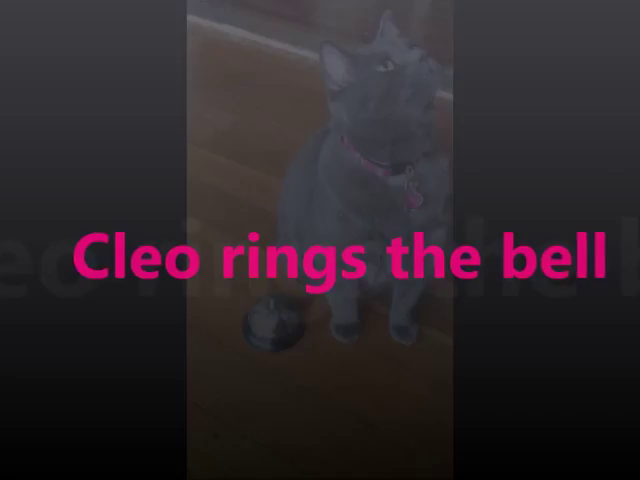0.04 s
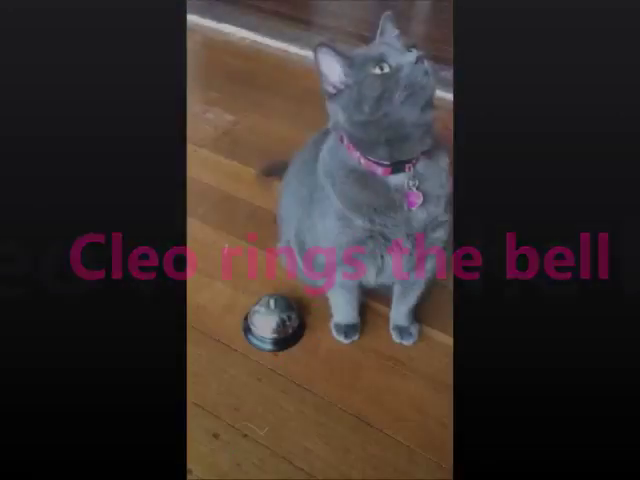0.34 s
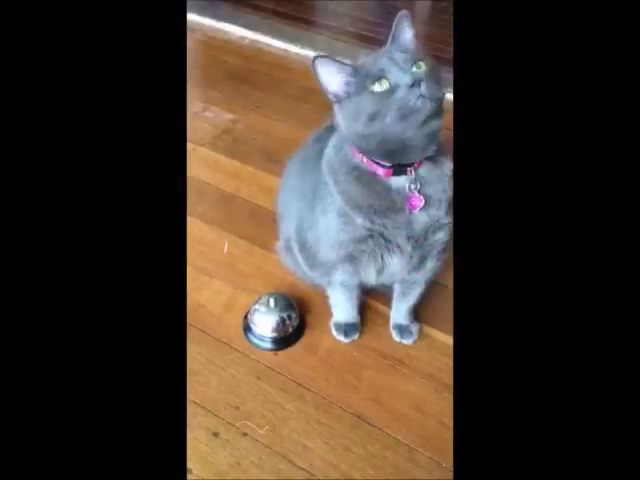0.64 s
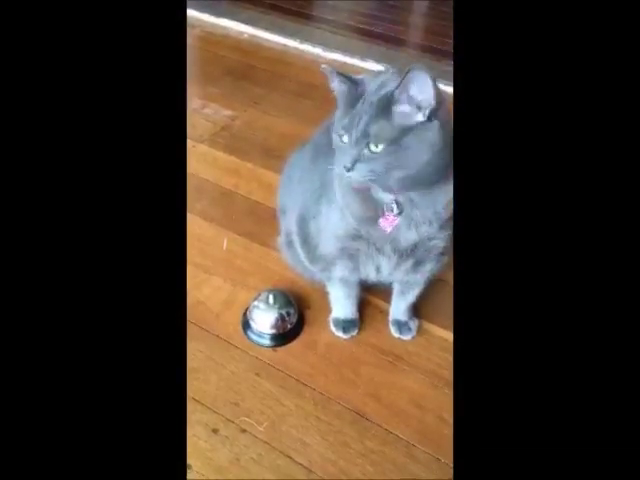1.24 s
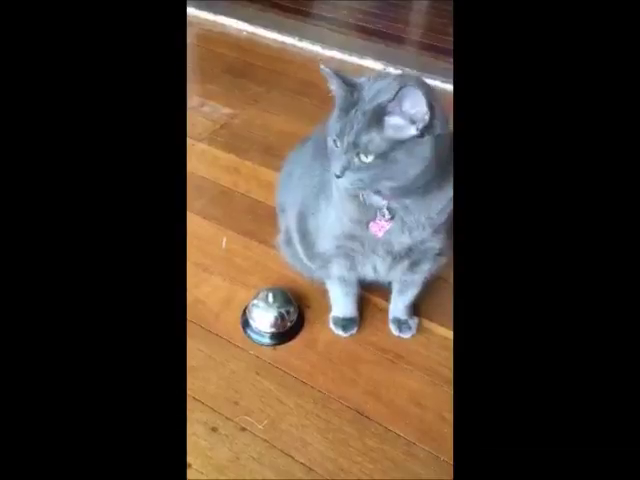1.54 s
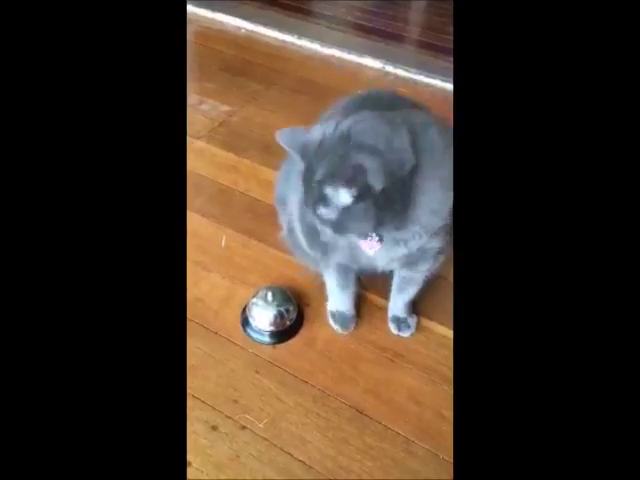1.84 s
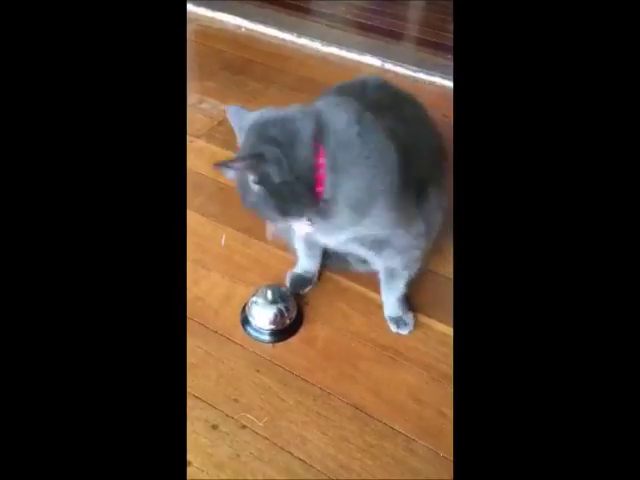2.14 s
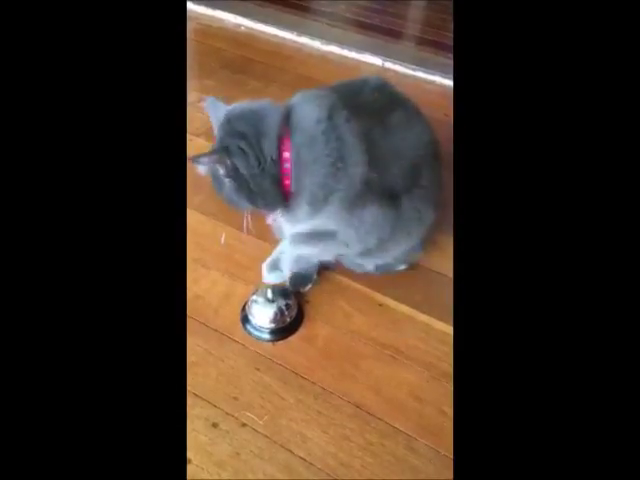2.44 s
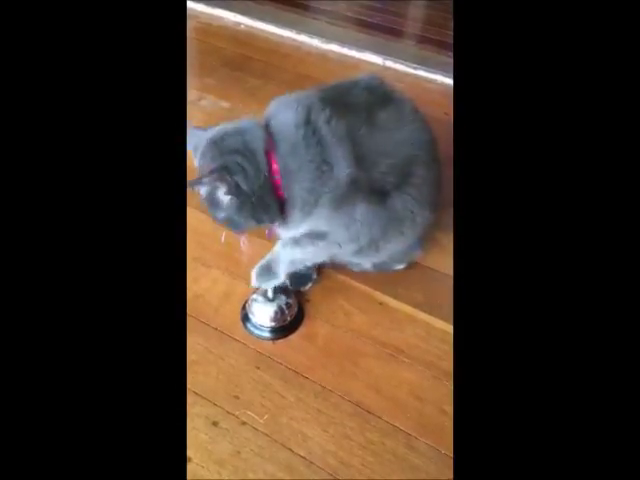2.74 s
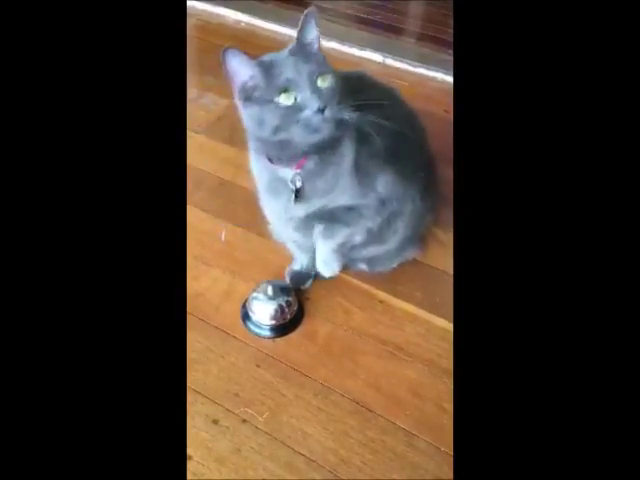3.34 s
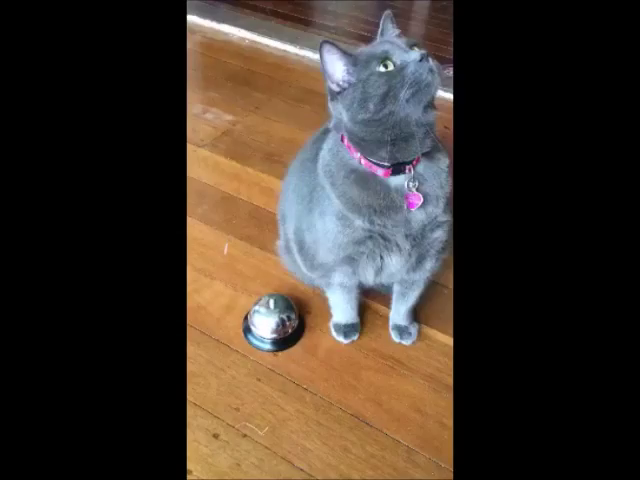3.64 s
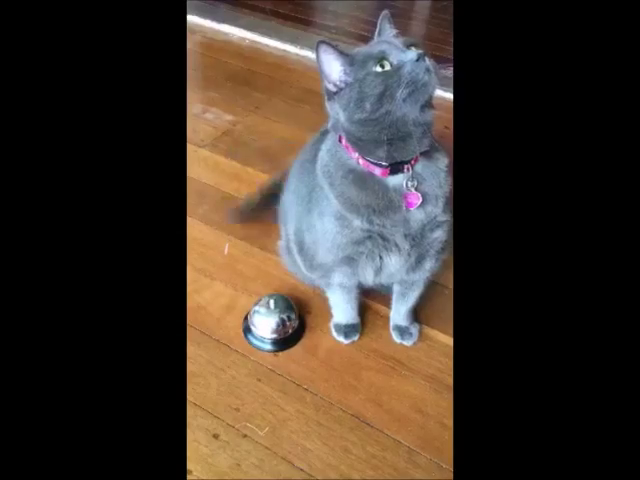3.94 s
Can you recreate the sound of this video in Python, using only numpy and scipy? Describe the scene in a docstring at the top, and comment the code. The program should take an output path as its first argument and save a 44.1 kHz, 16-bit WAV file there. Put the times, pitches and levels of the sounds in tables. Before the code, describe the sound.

A metal counter bell rings once, late, in a quiet room. Until then there is only low rumble and hum, faint distant birds and a cat's soft paw bumps and scuffs, around 0.4 and 2.6 seconds. At 2.9 seconds the plunger rattles and the bell gives a bright, wavering ding with a few small clicks. It cuts off mid-ring at 3.6 seconds; a faint dull rumble follows a brief silence.

```python
"""A quiet room with a wooden floor, where a cat paws a counter bell.
The plunger rattles down, the clapper strikes, and the dome rings in four beating pairs of modes.
Paws bump and scuff; behind them are faint far birds, an appliance hum, a low drone and room rumble.
The sound cuts off mid-ring, and after a short silence a duller rumble follows."""
import sys
import numpy as np
from scipy import signal
from scipy.fft import rfft, irfft
from scipy.io import wavfile

SR = 44100
rng = np.random.default_rng(int(sys.argv[2]) if len(sys.argv) > 2 else 0)


def put_to_file(sound):
    """Save the sound as 16-bit audio at rate SR, in the file named by the first command-line argument."""
    columns = np.atleast_2d(sound).T  # one column per channel
    safe = np.clip(columns, -1, 1)
    whole_steps = np.round(safe * 32767)
    wavfile.write(sys.argv[1], SR, whole_steps.astype(np.int16))


N = 176400

# Mode pairs of the dome: pitch_hz, twin_offset_hz, level_db, twin_relative_db, t60_s,
# in_phase_s, rise_s, prompt_relative_db
DOME_MODES = [(1036.5, -1.8, -53, -17, 16, .19, .003, 4), (2729.5, -6.88, -42.2, -.7, 4.0, .004, .006, -4),
              (5030.8, -11.7, -46.6, -2, 2.9, .043, .004, 11),
              (7872.5, -9.9, -32.2, -2.2, 1.04, .029, .012, -30)]

def dome(strike_s=2.911, prompt_decay_s=.025, gain_db=1.5):
    """Mode splitting: slight asymmetry gives each mode a close twin, and the pair beats as it decays."""
    t, out = np.arange(N) / SR, np.zeros(N)
    for hz, offset_hz, db, twin_db, t60, in_phase_s, rise_s, prompt_db in DOME_MODES:
        twin = amp(twin_db) * np.exp(2j * np.pi * offset_hz * (t - in_phase_s))
        prompt = amp(prompt_db) * np.exp(-t / prompt_decay_s)
        ring = ((1 + twin + prompt) * np.exp(2j * np.pi * (hz * t + rng.random()))).real
        envelope = decay(t, t60) * (1 - np.exp(-t / rise_s))
        add(out, strike_s, amp(gain_db + db) * ring * envelope)
    return out

# Impacts in the mechanism: start_s, ring_gain_db, click_level_db, click_centre_hz, click_width_octaves
IMPACTS = [(2.9019, -6, -9, 6700, .08), (2.9101, -6.5, -1, 6700, 0.14), (2.9107, -14.5, 0.5, 2006, 1),
           (2.9148, -2.5, -8.5, 1800, 1), (2.9248, -10.5, -8.5, 2490, .7), (2.9335, -6.5, -4, 1900, .4),
           (2.9385, 2, -3.5, 4200, .3), (2.9435, -5.5, -7, 4500, .6), (2.953, -14, -12, 4500, .4),
           (3.0216, -23.5, -8, 1600, .35), (3.0234, -12.5, -12, 6500, 0.09),
           (3.0345, -19.5, -15.5, 6600, .1), (3.069, -20, -14, 4540, .02), (3.19, -29, -30, 4200, .4),
           (3.236, -32, -22, 1150, .2), (3.28, -27.5, -29.5, 4200, .25)]
# Modes of the plunger, clapper and base: pitch_hz, level_db, t60_s
MECHANISM_MODES = [(1500, -49, .1), (1790, -52, .15), (2010, -48, .17), (2148, -53, .45), (3283, -46, .13),
                   (3322, -45, .24), (3440, -51, .15), (3765, -50, .17), (3984, -50, .24), (4190, -53, .12),
                   (4449, -47, .15), (4485, -47, .2), (4550, -44.5, .3), (5150, -51, .1), (5430, -52, .17),
                   (5960, -55, .2), (6520, -54, .15), (6830, -47, .15), (6940, -54, .2), (7981, -43, .27)]

def mechanism(click_gain_db=-31, click_decay_s=.0019):
    """Impact excitation: each blow of plunger and clapper gives a click and a short metal ring."""
    t, clicks, rings = np.arange(SR // 2) / SR, np.zeros(N), np.zeros(N)
    for start_s, ring_db, click_db, hz, octaves in IMPACTS:
        click = noise(lambda f: hump(f, hz, octaves), len(t)) * np.exp(-t / click_decay_s)
        add(clicks, start_s, amp(click_gain_db + click_db) * click)
        ring = sum(amp(db) * decay(t, t60) * sine(f, t) for f, db, t60 in MECHANISM_MODES)
        add(rings, start_s, amp(ring_db) * ring)
    return clicks, rings

def bell():
    """Superposition: the direct sound of the bell adds to the reflections of its mechanism."""
    clicks, rings = mechanism()
    return dome() + clicks + rings + reflections(amp(6) * clicks + amp(-7) * rings)

# Reverberation time of the room: frequency_hz, t60_s
ROOM_DECAY = [(200, 4), (1500, 0.97), (4000, 1.15), (8000, 0.9)]
# Colour of the reflections: frequency_hz, gain_db
ROOM_RESPONSE = [(100, -0.5), (700, -2), (1500, 0), (3000, -4.5), (6800, -1), (7600, -7.5), (8500, -14.5)]

def reflections(x, early_db=-4.5, late_db=-11):
    """Reverberation: dense early echoes off floor and walls, then a tail that lasts longest in the bass."""
    early = rng.standard_normal(SR) * decay(np.arange(SR) / SR, t60=.14)
    hz, times, spectra = signal.stft(rng.standard_normal(SR), SR, nperseg=256)
    damping = decay(times, log_interp(ROOM_DECAY, hz)[:, None])
    late = signal.istft(spectra * damping, SR, nperseg=256)[1][:SR]
    response = (amp(early_db) * unit(early) + amp(late_db) * unit(late)) / np.sqrt(SR)
    echoes = signal.fftconvolve(x, response)[:N]
    return shaped(echoes, lambda f: amp(log_interp(ROOM_RESPONSE, f)))

# Paw bumps on the floor: start_s, pitch_hz, level_db, length_s
PAW_BUMPS = [(.395, 75.4, -45, .045), (.47, 85, -49, .035), (2.635, 310, -49.5, 0.023),
             (2.86, 331, -53, 0.021)]
# Scuffs of fur and paws: start_s, length_s, centre_hz, width_octaves, level_db
PAW_SCUFFS = [(.3, 0.44, 2700, 0.44, -75), (1.479, 0.23, 3970, 1, -72.5), (1.878, 0.21, 2700, 0.62, -77.5),
              (2.101, .13, 5700, 0.79, -69.5), (2.579, 0.27, 4500, .8, -77.5),
              (2.849, 0.1, 1300, 0.44, -66.5)]

def paws():
    """Soft impact and friction: the cat's shifting feet make low pulses and swells of band noise."""
    out = np.zeros(N)
    for start_s, hz, db, length_s in PAW_BUMPS:
        t = np.arange(0, length_s, 1 / SR)
        add(out, start_s, amp(db) * np.sin(np.pi * t / length_s) * np.sin(2 * np.pi * hz * t))
    for start_s, length_s, hz, octaves, db in PAW_SCUFFS:
        progress = np.arange(0, length_s, 1 / SR) / length_s
        friction = noise(lambda f: hump(f, hz, octaves), SR)[:len(progress)]
        add(out, start_s, amp(db) * np.sin(np.pi * progress) * friction)
    return lowpass(out, hz=7800)

# Far bird notes: start_s, length_s, first_hz, last_hz, level_db
BIRD_NOTES = [(0.301, 0.22, 6030, 5900, -80.5), (.5, .14, 3890, 4060, -77.5), (0.502, .22, 3254, 2945, -77),
              (.53, .23, 5650, 5430, -80), (1.468, 0.19, 4040, 3900, -78.5), (1.92, .17, 4000, 3810, -73),
              (1.99, 0.19, 3350, 3080, -73.5), (2.29, 0.16, 3650, 3350, -77), (2.629, .13, 3790, 3950, -75),
              (2.662, 0.22, 6040, 5800, -81.5), (2.722, 0.16, 3100, 2890, -78)]

def birds(blur_hz=210, flutter_db=3):
    """Spectral broadening: random modulation breaks and blurs gliding notes heard from afar."""
    out = np.zeros(N)
    for start_s, length_s, first_hz, last_hz, db in BIRD_NOTES:
        progress = np.arange(0, length_s, 1 / SR) / length_s
        phase = 2 * np.pi * np.cumsum(first_hz + (last_hz - first_hz) * progress) / SR
        blur = (drift(blur_hz, SR) + 1j * drift(blur_hz, SR))[:len(phase)]
        flutter = amp(flutter_db * drift(width_hz=50, size=SR)[:len(phase)])
        envelope = flutter * np.sqrt(np.sin(np.pi * progress))
        add(out, start_s, amp(db) * unit(envelope * (blur * np.exp(1j * phase)).real))
    return out

# Appliance tones: pitch_hz, level_db
HUM_TONES = [(101, -70), (405.3, -71), (439.7, -67.5), (473.7, -72)]

def appliance_hum(depth=.22):
    """Amplitude modulation: each steady pitch wavers slowly and randomly in level."""
    t = np.arange(N) / SR
    return sum(amp(db) * unit((1 + depth * drift(width_hz=6)) * sine(hz, t)) for hz, db in HUM_TONES)

# Envelope of the drone: time_s, level_db
DRONE_LEVELS = [(.14, -63.5), (.6, -66.5), (1.1, -64), (1.35, -59), (1.7, -63), (2, -72), (3.6, -72.5)]

def drone(centre_hz=159.4, width_hz=10):
    """Narrowband noise: heard as one low pitch that swells and fades."""
    band = noise(lambda f: np.exp(-.5 * (2 * (f - centre_hz) / width_hz) ** 2))
    return gain_curve(DRONE_LEVELS) * band

# Spectrum of the room noise: frequency_hz, relative_db
ROOM_SPECTRUM = [(12, -42.5), (20, -16), (40, -2.5), (85, -1.5), (124, -5.5), (200, -5.5), (270, -7),
                 (380, -10.5), (470, -15.5), (676, -21.5), (1400, -25), (2730, -28), (3880, -30.5),
                 (4700, -35), (5800, -33.5), (7800, -37)]
# Swells of the rumble: time_s, gain_db
RUMBLE_GAINS = [(.14, 3), (.6, 4), (1.1, -1.5), (2.2, -0.5), (3.6, -0.5)]
# Swells of the low mids: time_s, gain_db
LOW_MID_GAINS = [(.14, -2), (.9, 4), (1.6, 0.5), (2.2, -3), (3.6, -1.5)]

def room_noise():
    """Coloured noise: rumble and faint hiss, with two low bands rising and falling separately."""
    air = amp(-59) * noise(lambda f: amp(log_interp(ROOM_SPECTRUM, f)))
    for gains, hz, octaves in (RUMBLE_GAINS, 50, 1), (LOW_MID_GAINS, 290, .5):
        band = shaped(air, lambda f: hump(f, hz, octaves))
        air += band * (gain_curve(gains) - 1)
    return lowpass(air, hz=7800)

# Spectrum of the closing rumble: frequency_hz, relative_db
DULL_SPECTRUM = [(12, -34.5), (20, -8.5), (45, -2.5), (85, -4), (141, -18), (210, -9.5), (270, -16.5),
                 (330, -27), (614, -28.5), (1400, -33), (3800, -41)]

def dull_rumble(start_s=3.754):
    """Low-pass filtering: noise without its treble is heard as a dull rumble."""
    rumble = amp(-55.5) * noise(lambda f: amp(log_interp(DULL_SPECTRUM, f)))
    return lowpass(rumble * (np.arange(N) / SR > start_s), hz=3900)

def amp(db):
    """Decibels to amplitude ratio."""
    return 10 ** (np.asarray(db) / 20)

def unit(x):
    """Normalisation to rms 1."""
    return x / np.sqrt(np.mean(x ** 2) + 1e-20)

def decay(t, t60):
    """Exponential damping: 60 dB in t60 seconds."""
    return np.exp(-np.log(1000) * t / t60)

def sine(hz, t):
    """Harmonic motion with a random starting phase."""
    return np.sin(2 * np.pi * (hz * t + rng.random()))

def gain_curve(points):
    """Amplitude envelope, interpolated in decibels over time."""
    return amp(np.interp(np.arange(N) / SR, *np.transpose(points)))

def log_interp(points, hz):
    """Interpolation on a log-frequency axis."""
    f, value = np.transpose(points)
    return np.interp(np.log(hz + 1), np.log(f + 1), value)

def add(mix, start_s, sound):
    """Superposition of a delayed sound on the mix."""
    part = mix[round(start_s * SR):][:len(sound)]
    part += sound[:len(part)]

def shaped(x, gain):
    """Zero-phase filtering by a function of frequency."""
    return irfft(rfft(x) * gain(np.fft.rfftfreq(len(x), 1 / SR)), len(x))

def noise(gain, size=N):
    """Gaussian noise of rms 1 with the given spectrum."""
    return unit(shaped(rng.standard_normal(size), gain))

def hump(f, hz, octaves):
    """Gaussian passband on a log-frequency axis."""
    return np.exp(-.5 * (np.log2((f + 1) / hz) / octaves) ** 2)

def drift(width_hz, size=N):
    """Slow random fluctuation of rms 1."""
    return noise(lambda f: np.exp(-.5 * (2 * f / width_hz) ** 2), size)

def lowpass(x, hz):
    """Steep windowed-sinc low-pass."""
    return signal.oaconvolve(x, signal.firwin(401, hz, window=("kaiser", 8), fs=SR), "same")

def scene(on_s=.14, off_s=3.6):
    """Gating: the summed sources cut off mid-ring, leaving a short silence before the dull rumble."""
    t = np.arange(N) / SR
    room = bell() + paws() + birds() + room_noise() + appliance_hum() + drone()
    gate = (t > on_s) & (t < off_s)
    return (room * gate + dull_rumble())[None]

def record(dry):
    """Band limiting: the highest treble is removed."""
    return lowpass(dry[0], hz=8700)[None]

dry = scene()
out = record(dry)
put_to_file(out)
```